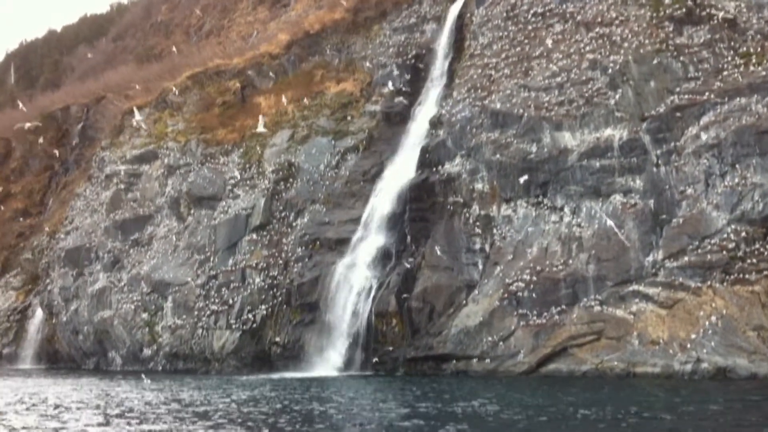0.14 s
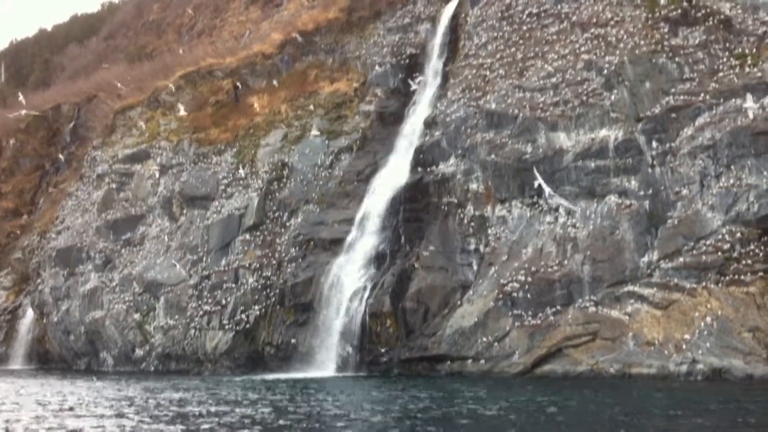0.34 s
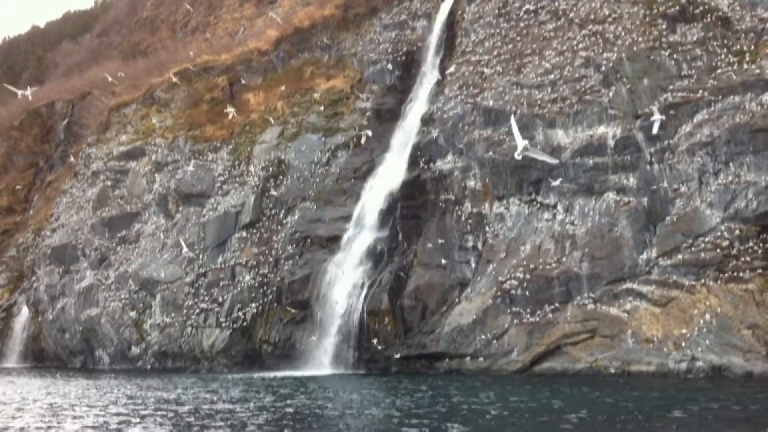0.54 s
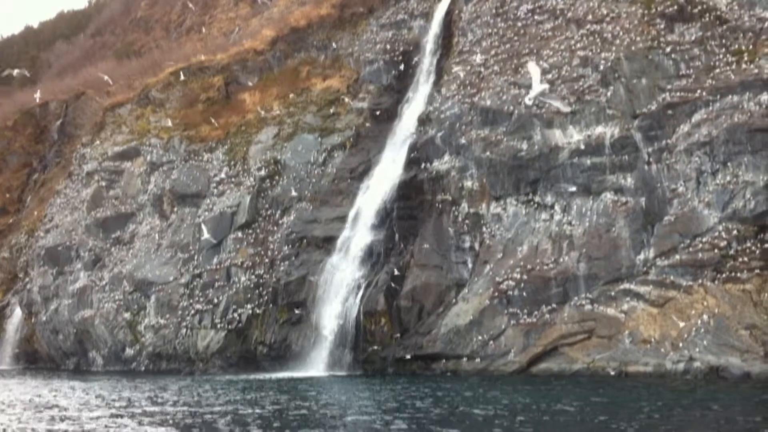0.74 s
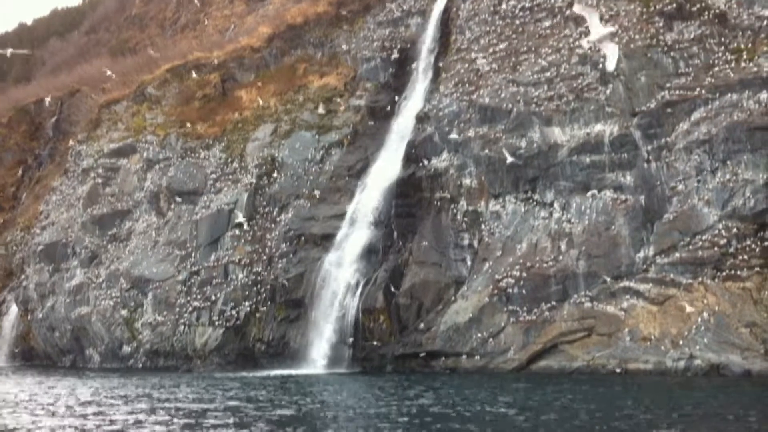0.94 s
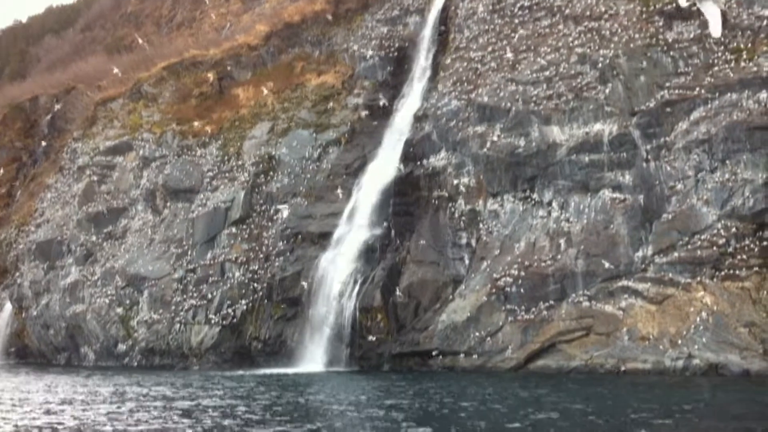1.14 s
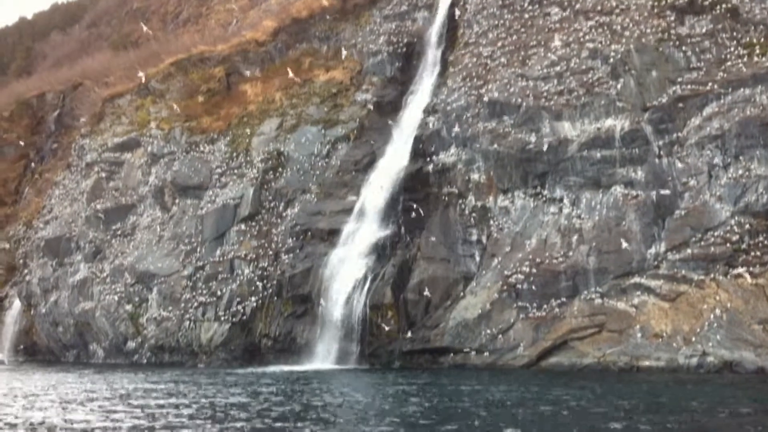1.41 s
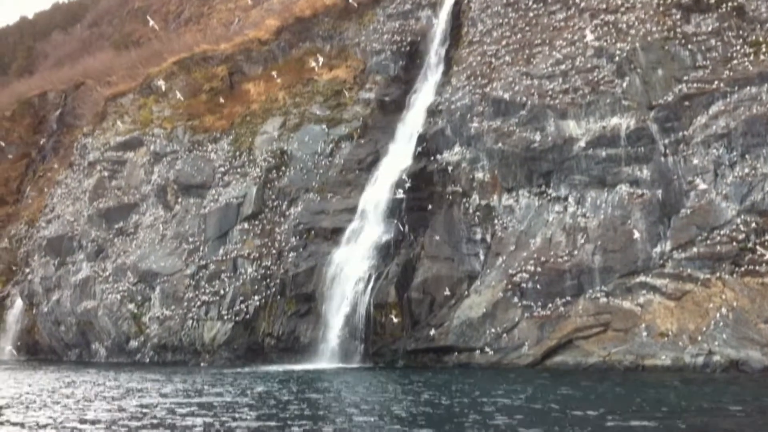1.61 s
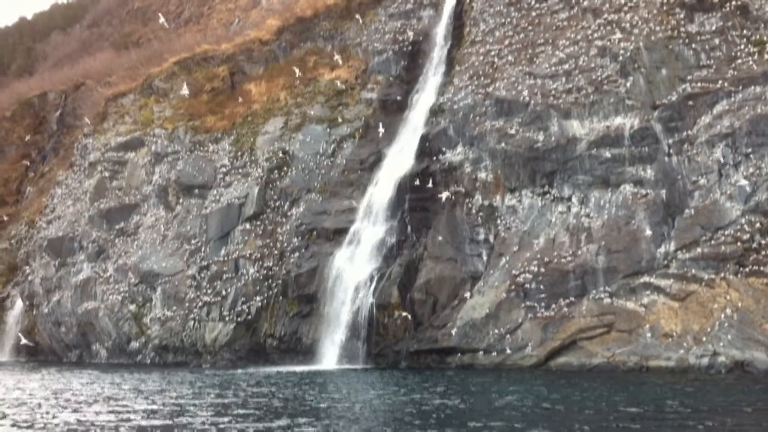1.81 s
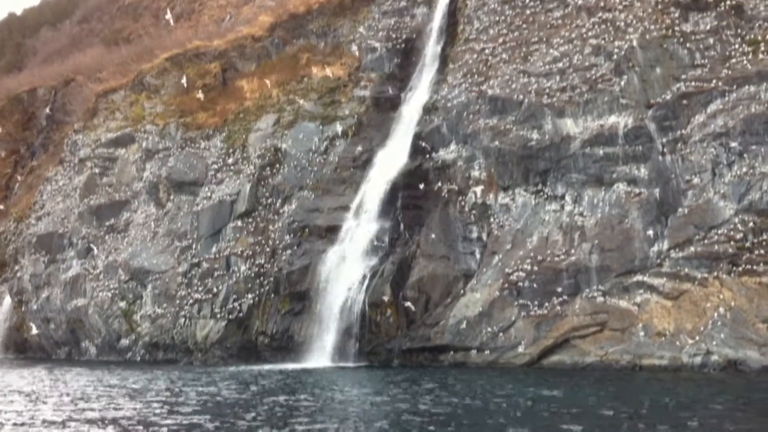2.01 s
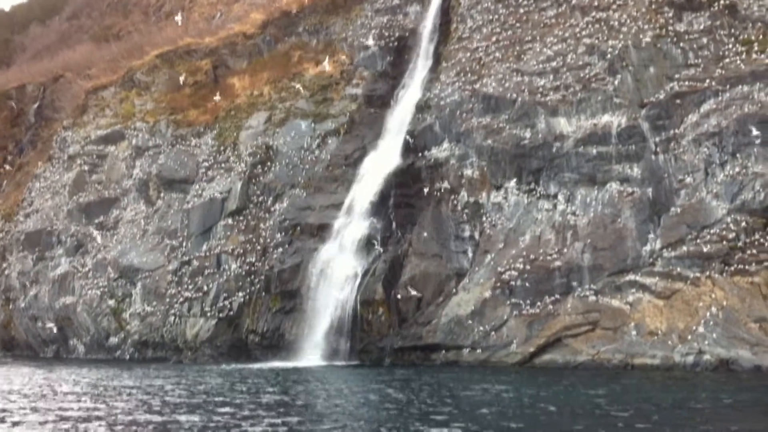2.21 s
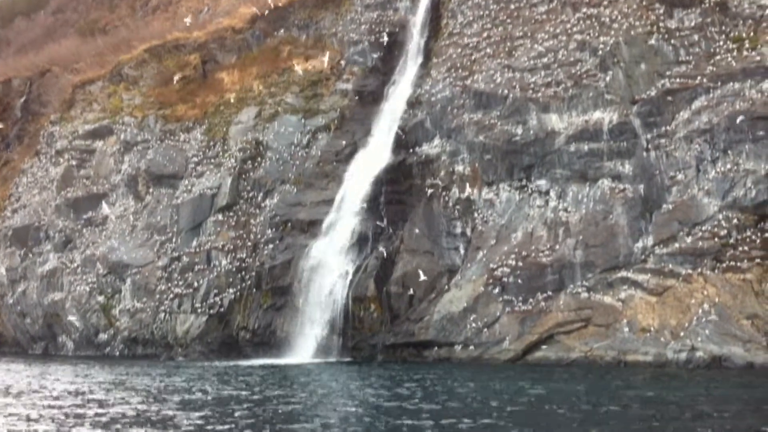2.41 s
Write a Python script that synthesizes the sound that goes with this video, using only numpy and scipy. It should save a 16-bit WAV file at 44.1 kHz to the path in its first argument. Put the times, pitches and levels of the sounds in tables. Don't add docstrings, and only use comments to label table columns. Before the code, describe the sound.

A dense seabird colony piping and chattering on a sea cliff over a steady waterfall roar

```python
import sys
import numpy as np
from scipy import signal
from scipy.fft import rfft, irfft, next_fast_len
from scipy.io import wavfile
from scipy.ndimage import uniform_filter1d

SR = 44100
rng = np.random.default_rng(int(sys.argv[2]) if len(sys.argv) > 2 else 0)


def gain_from_db(level_db):
    decades = np.asarray(level_db, float) / 20
    return 10 ** decades


def dump(signal):
    limited = np.clip(np.atleast_2d(signal).T, -1, 1)
    pcm = np.round(limited * 32767).astype(np.int16)
    wavfile.write(sys.argv[1], SR, pcm)


N = 112455

# [frequency_hz, density_db]
FALLS_SPECTRUM = [(40, -54), (100, -54), (150, -16), (390, -14), (850, -11), (3000, -10.5), (5200, -17),
                  (10600, -29)]
# [center_hz, width_hz, level_db]
HULL_HUM = [(160, 6.5, -47), (216.7, 7.5, -48.5), (603, 41.4, -45), (111.6, 12, -66.5)]
# [start_s, pitch_hz, peak_db]
HULL_KNOCKS = [
    (0.2, 280.6, -33.5),
    (0.566, 180, -35.5),
    (1.099, 231.4, -34),
    (1.21, 160, -80),
    (2.5, 298, -38.5),
]
# [time_s, level_db]
COLONY_EXCITEMENT = [(0, -1), (.25, 0), (.45, 1), (.6, -1), (.85, 2.5), (1.05, -2), (1.15, -0.5), (1.4, -1),
                     (1.55, 0), (1.75, 1), (2.1, 1), (2.4, 0.5), (2.55, 2)]
MELLOW_VOICE = [0.5, -23.5, -18.5, -40]
FAR_SHRILL_VOICE = [-8, -1, -12, -21.5]
NEAR_SHRILL_VOICE = [-14, 1, -15, -30]
# [start_s, length_s, pitch_hz,
# level_db, final_sag_share]
MELLOW_NOTES = [(.092, 0.058, 1840, -38, 0.045), (.180, 0.1, 1705, -28.5, 0.051),
                (.243, 0.061, 1851, -30.5, 0.011), (.293, 0.08, 1324, -37, 0.055),
                (.372, 0.088, 1891, -31.5, -0.034), (.388, 0.037, 1757, -29, 0.025),
                (.463, 0.098, 1790, -32.5, 0.023), (.475, 0.06, 1707, -27.5, 0.039),
                (.645, 0.042, 1784, -35, 0.035), (.782, 0.051, 1880, -31.5, 0.032),
                (.815, 0.055, 1913, -33, 0.037), (.840, 0.032, 1760, -35, 0.016),
                (.928, 0.097, 1673, -28, .085), (1.035, 0.05, 1747, -33.5, 0.077),
                (1.103, 0.062, 1183, -39, 0.06), (1.207, 0.07, 1870, -27, 0.0044),
                (1.472, 0.078, 1815, -34, 0.03), (1.66, 0.05, 2120, -38, 0.015),
                (1.642, 0.058, 1403, -37.5, 0.028), (1.648, 0.078, 1926, -31, 0.0),
                (1.700, 0.081, 1855, -33.5, 0.075), (2.072, 0.047, 2050, -36.5, -0.0037),
                (2.085, 0.065, 1927, -32.5, 0.042), (2.155, 0.05, 1640, -34, -0.032),
                (1.596, 0.052, 1483, -35, 0.015),
    (1.945, 0.032, 1930, -36, 0.015),
    (1.993, 0.065, 1860, -36.5, 0.12),
    (2.228, 0.084, 1700, -35.5, 0.068),
    (2.311, 0.037, 2036, -35, 0.0062),
    (2.372, 0.08, 1590, -39, 0.036),
    (2.468, 0.078, 1767, -38, 0.0025),
    (.72, 0.054, 1670, -36.5, 0.061),
                (0.35, 0.09, 2160, -39.5, 0.0098), (3.5, 0.044, 1800, -40, .03),
                   (1.7, 0.038, 2100, -39, 0.035), (2.2, 0.047, 1870, -36.5, -0.024),
                   (.69, .035, 1600, -36, 0.034), (1.33, 0.028, 750, -42.5, 0.037),
                   (.425, 0.0415, 1735, -28, -0.033), (0.65, 0.032, 1750, -36, .06),
                   (0.89, 0.047, 2300, -38, .02), (1.225, 0.045, 1740, -34, 0.05),
                   (1.47, 0.051, 1800, -33, -0.03), (1.468, .035, 1700, -37.5, 0.055),
                   (1.4, 0.056, 1790, -40, 0.04), (1.6, .09, 1290, -36, 0.102),
                   (1.3, 0.043, 1400, -38, 0.022), (1.865, 0.0605, 1600, -39, 0.017),
                   (1, 0.034, 1420, -44, 0.0098), (3.7, 0.031, 1100, -37, .02), (2.6, 0.061, 1940, -33, .0),
                   (0.33, 0.071, 1720, -34, 0.023)]
# [start_s, length_s, pitch_hz,
# level_db, final_sag_share]
SHRILL_NOTES = [(.026, 0.032, 2267, -45, 0.007), (.064, 0.036, 1715, -37, 0.012),
                (.076, 0.08, 1530, -42, 0.028), (.136, 0.056, 1509, -39, 0.011),
                (.13, 0.056, 1760, -43, 0.0095), (.266, 0.084, 1670, -33, 0.055),
                (.437, 0.033, 1090, -45, -0.07), (.478, 0.074, 1400, -38, 0.058),
                (.641, 0.043, 1120, -39, 0.029), (.765, 0.054, 1290, -39, -0.011),
                (.776, 0.076, 1595, -41.5, 0.0023), (.836, 0.033, 1297, -35, -0.061),
                (.903, 0.0604, 1454, -31, 0.047), (.978, 0.054, 1696, -39, 0.0033),
                (1.319, 0.059, 1274, -38.5, 0.068), (1.505, 0.027, 1780, -32.5, 0.04),
                (1.574, 0.03, 1660, -41, -0.0032), (1.678, 0.094, 1660, -32, 0.11),
                (1.786, 0.066, 1628, -35.5, 0.055), (1.795, 0.037, 2140, -36, 0.035),
                (1.797, 0.035, 1790, -30.5, 0.15), (1.893, 0.052, 1738, -36.5, 0.0039),
                (2.203, 0.073, 1706, -32.5, -0.036), (2.508, 0.046, 1404, -37, 0.046),
                (0.386, 0.049, 1870, -39, 0.0099), (0.74, 0.023, 1975, -35.5, -0.011),
                 (0.809, .05, 1930, -40, 0.037), (.845, 0.053, 1828, -37.5, 0.039),
                 (1.475, .04, 1900, -43, 0.06), (1.814, .045, 2600, -38, 0.021),
                 (1.991, 0.02, 1914, -34, -0.016), (2.01, 0.044, 1765, -38.5, 0.05),
                 (2.065, 0.116, 2054, -38, 0.0062), (2.32, 0.055, 2005, -37, 0.027),
                 (1.944, 0.021, 1590, -37, .02), (1.821, 0.051, 2046, -41, -.04),
                (.2, 0.061, 1240, -42.5, 0.025), (.33, .06, 1850, -50, 0), (.42, .04, 2000, -39, 0.026),
                (2.16, .04, 770, -46, 0.051), (0.14, .03, 1990, -38, 0.022), (1.12, .04, 1900, -47, .0),
                (0.572, 0.021, 1800, -46, 0.017), (0.748, 0.028, 1675, -37, .01),
                (0.85, 0.019, 1300, -33.5, 0.03), (1.37, 0.034, 1478, -37, 0.015),
                (1.4, 0.064, 1215, -41, 0.024), (1.385, 0.016, 1925, -36.5, .01),
                (1.863, 0.031, 1620, -37, -0.0067), (0.664, 0.036, 1465, -44, -.02),
                (.69, 0.022, 1770, -37, 0.05), (2.403, .03, 1560, -39, 0.024),
                (2.515, .035, 1960, -37, 0.0087)]
# [low_hz, high_hz, time_share, level_db]
FLICKER_BANDS = [(2250, 3050, .4, -19), (2950, 3850, .16, -12), (4200, 5100, .05, -10),
                 (5200, 6150, .2, -6), (6200, 7600, .025, -6)]
# [frequency_hz, gain_db]
MIC_ROLLOFF = [(10600, -1), (12000, -3.5), (14000, -15), (15700, -22)]

RASP_S = 0.003


def evened(x):
    return x / np.sqrt(np.mean(x ** 2) + 1e-20)


def read(points, hz):
    f, value = np.transpose(points)
    return np.interp(np.log(hz + 1), np.log(f + 1), value)


def add(mix, start_s, sound):
    part = mix[max(round(start_s * SR), 0):][:len(sound)]
    part += sound[:len(part)]


def wander(seconds):
    size = max(round(seconds * SR), 2)
    return evened(uniform_filter1d(uniform_filter1d(rng.standard_normal(N), size), size))


def waterfall():
    level_db, patchy_db, swell_db = -31, 1, 0.45
    frames, hz = N // 256 + 5, np.fft.rfftfreq(1024, 1 / SR)
    a, b, patches = rng.standard_normal((frames, 513, 3)).T
    patches = uniform_filter1d(patches, size=8, axis=0)
    patches = evened(uniform_filter1d(patches, size=14, axis=1))
    swell = evened(uniform_filter1d(rng.standard_normal(frames), size=16))
    spectrum_db = read(FALLS_SPECTRUM, hz)[:, None] + patchy_db * patches + swell_db * swell
    roar = signal.istft((a + 1j * b) * gain_from_db(spectrum_db), nperseg=1024, noverlap=768)[1][:N]
    return gain_from_db(level_db) * evened(roar)


def boat():
    rise_s, t60_s = 0.0017, 0.31
    t, mix = np.arange(N) / SR, np.zeros(N)
    for hz, width_hz, db in HULL_HUM:
        in_phase = wander(0.17 / width_hz) * np.sin(2 * np.pi * hz * t)
        quadrature = wander(0.31 / width_hz) * np.cos(2 * np.pi * hz * t)
        mix += gain_from_db(db) * (in_phase + quadrature)
    u = t[:SR // 4]
    for start_s, hz, db in HULL_KNOCKS:
        envelope = gain_from_db(db - 60 * u / t60_s) * (1 - np.exp(-(u / rise_s) ** 2))
        add(mix, start_s, envelope * np.sin(2 * np.pi * hz * u))
    return mix


def cliff(x):
    t60_s, delay_s, density = 0.2, 0.012, 0.05
    t = np.arange(SR // 2) / SR
    taps = rng.standard_normal(len(t)) * (rng.random(len(t)) < density) * (t > delay_s)
    taps = taps * gain_from_db(-60 * t / t60_s)
    return signal.fftconvolve(x, taps / np.linalg.norm(taps))[:N]


def note(length_s, hz, db, sag, partials_db, waver, rasp, phase):
    attack_s, release_s, scoop_share, scoop_s = 0.009, 0.02, 0.01, 0.008
    pitch_arch, level_arch, waver_share, rasp_share = 0.018, 0.25, 0.003, 0.25
    t = np.arange(0, length_s, 1 / SR)
    arch = np.sin(np.pi * t / length_s)
    at = int(phase * (N - len(t)))
    span = slice(at, at + len(t))
    bend = 1 - scoop_share * np.exp(-t / scoop_s) + sag * (0.35 - (t / length_s) ** 1.5)
    bend = bend + pitch_arch * (arch - 0.64) + waver_share * waver[span]
    turns = np.cumsum(hz * bend) / SR + phase
    tone = sum(gain_from_db(p) * np.sin(2 * np.pi * k * turns) for k, p in enumerate(partials_db, 1))
    ramp = np.clip(np.minimum(t / attack_s, (length_s - t) / release_s), 0, 1)
    envelope = np.sin(ramp * np.pi / 2) * (1 + level_arch * (arch - 0.7))
    return np.sqrt(2) * gain_from_db(db) * envelope * (1 + rasp_share * rasp[span]) * tone


def chorus():
    count, level_db, echo_db = 950, -32.5, -8
    center_hz, note_s, sag_share = 1780, 0.045, 0.055
    size_db, largest, shrill_gain_db = 2.5, 0.7, -0.5
    waver, rasp, mix = wander(0.0068), wander(RASP_S), np.zeros(N)
    even, bell = rng.random((count, 4)), rng.standard_normal((count, 3))
    even[:, 0] = (np.arange(count) + even[:, 0]) / count
    for (when, voice, long, phase), (pitch, size, sag) in zip(even, bell):
        db = size_db * min(size, largest)
        if voice < 0.5:
            partials_db, base_hz, spread = FAR_SHRILL_VOICE, center_hz * 0.9, 0.13
            db += shrill_gain_db
        else:
            partials_db, base_hz = MELLOW_VOICE, center_hz
            spread = 0.077 if pitch > -0.4 else 0.2
        hz = base_hz * np.exp(spread * (pitch + 0.4))
        sound = note(note_s * (0.5 + long), hz, db, sag_share * (1 + sag), partials_db, waver, rasp, phase)
        add(mix, when * N / SR, sound)
    time_s, excitement_db = np.transpose(COLONY_EXCITEMENT)
    swell_db = np.interp(np.arange(N) / SR, time_s, excitement_db)
    return gain_from_db(level_db + swell_db) * evened(mix + gain_from_db(echo_db) * cliff(mix))


def near_birds():
    echo_db, extra_rasp = -12, 1.3
    waver, rasp, mix = wander(0.012), extra_rasp * wander(RASP_S), np.zeros(N)
    voices = ((MELLOW_NOTES, MELLOW_VOICE),
              (SHRILL_NOTES, NEAR_SHRILL_VOICE))
    for notes, partials_db in voices:
        for start_s, length_s, hz, db, sag in notes:
            phase = (hz * np.pi) % 1
            add(mix, start_s, note(length_s, hz, db, sag, partials_db, waver, rasp, phase))
    return mix + gain_from_db(echo_db) * cliff(mix)


def scene():
    mid = waterfall() + boat() + chorus() + near_birds()
    return np.array([mid, mid])


def channel_flicker(mid):
    side, late = np.zeros(N), np.roll(mid, SR // 3)
    for low_hz, high_hz, share, db in FLICKER_BANDS:
        chance = uniform_filter1d(rng.standard_normal(N // 1024 + 1), size=2)
        is_open = 1.0 * (chance > np.quantile(chance, 1 - share))
        gate = uniform_filter1d(np.repeat(is_open, 1024)[:N], size=300)
        band = signal.butter(6, [low_hz, high_hz], "bandpass", fs=SR, output="sos")
        side += gain_from_db(db) * gate * signal.sosfilt(band, late)
    return side * np.array([[1], [-1]])


def ragged_top(x):
    edge_hz, edge_wander_hz, stray_share, stray_db = 14750, 230, 0.014, 13
    hz, t, z = signal.stft(x, SR, nperseg=2048, noverlap=1024)
    edge = edge_hz + edge_wander_hz * evened(uniform_filter1d(rng.standard_normal(len(t)), size=2))
    lines = rng.random((len(t), len(hz))).T < stray_share
    stray = gain_from_db(stray_db) * lines * (rng.random(len(t)) < 0.4)
    z = z * np.where(hz[:, None] < edge, 1, stray)
    return signal.istft(z, SR, nperseg=2048, noverlap=1024)[1][:, :N]


def band_limit(x):
    return signal.sosfilt(signal.butter(12, 15620, fs=SR, output="sos"), x)


def record(dry):
    size = next_fast_len(N)
    rolloff = gain_from_db(read(MIC_ROLLOFF, np.fft.rfftfreq(size, 1 / SR)))
    x = irfft(rfft(dry, size) * rolloff, size)[:, :N]
    mix = ragged_top(x) + channel_flicker(x[0])
    return band_limit(mix)


dry = scene()
out = record(dry)
dump(out)
```